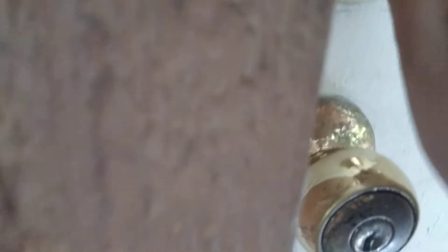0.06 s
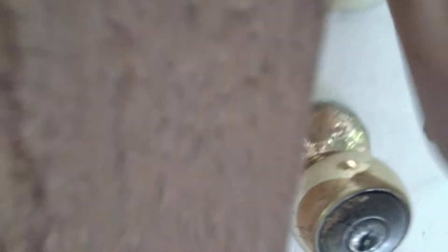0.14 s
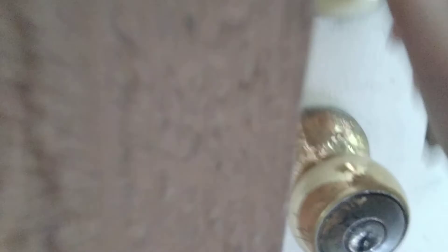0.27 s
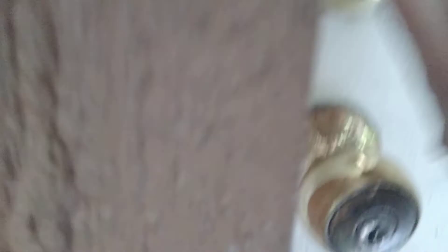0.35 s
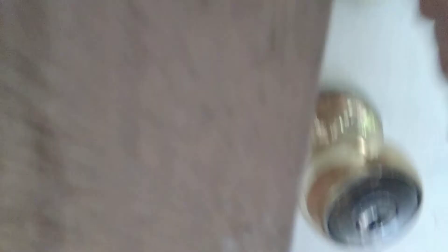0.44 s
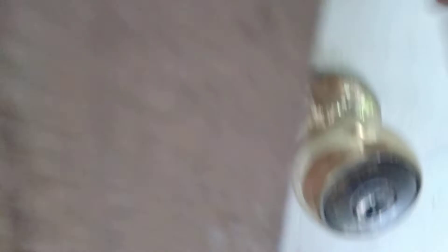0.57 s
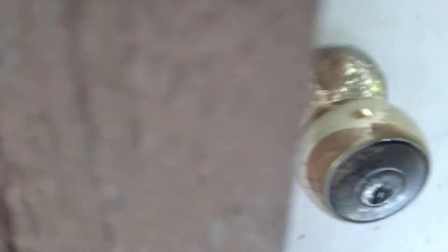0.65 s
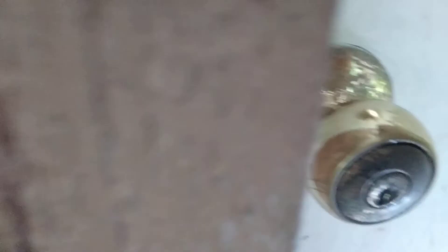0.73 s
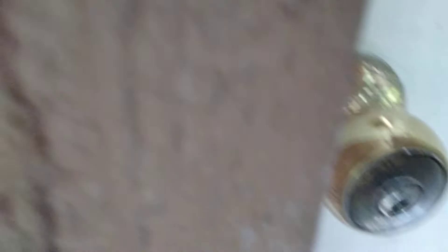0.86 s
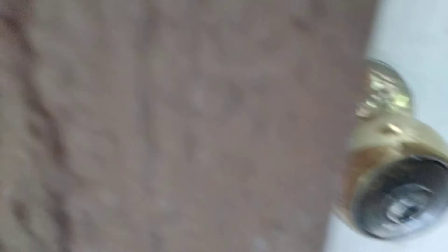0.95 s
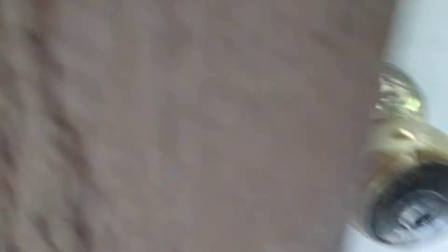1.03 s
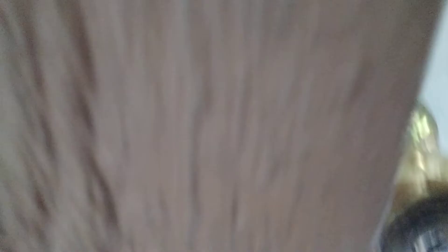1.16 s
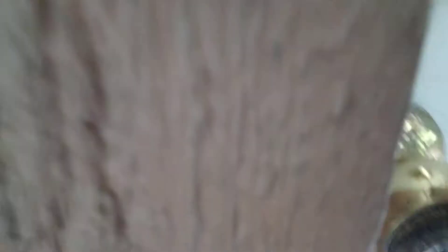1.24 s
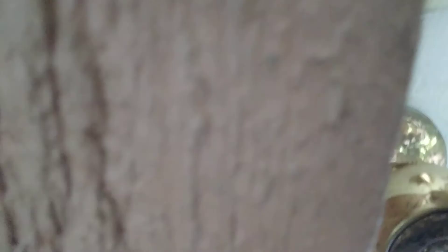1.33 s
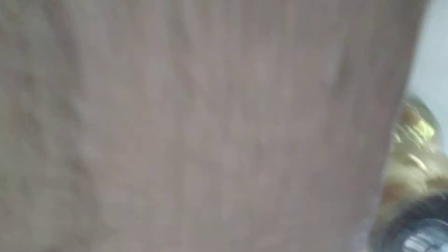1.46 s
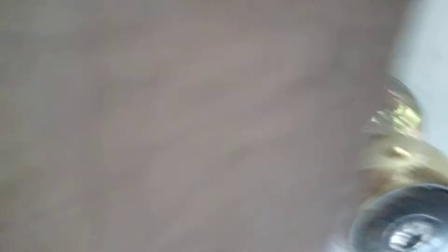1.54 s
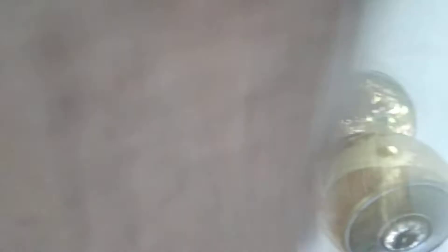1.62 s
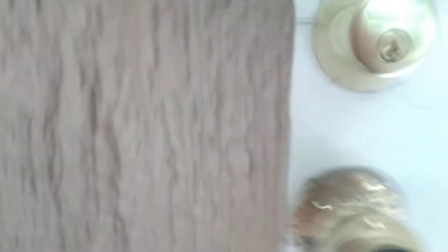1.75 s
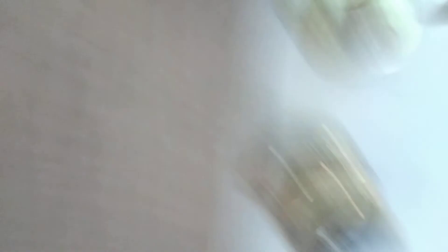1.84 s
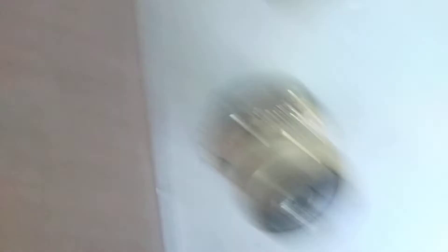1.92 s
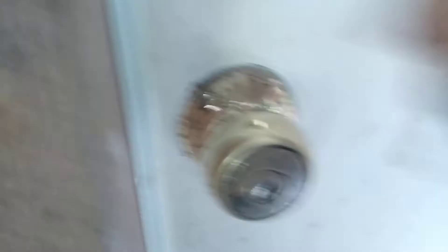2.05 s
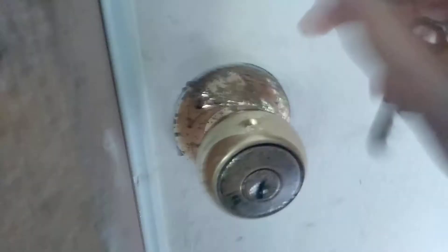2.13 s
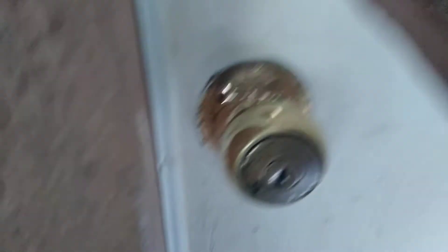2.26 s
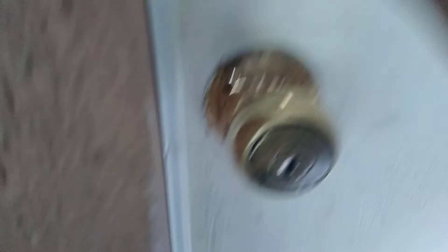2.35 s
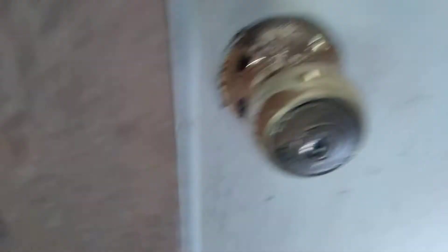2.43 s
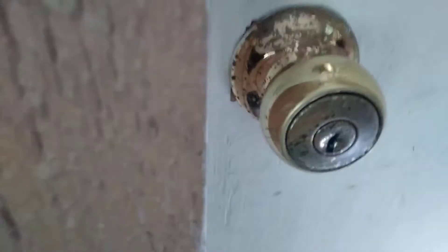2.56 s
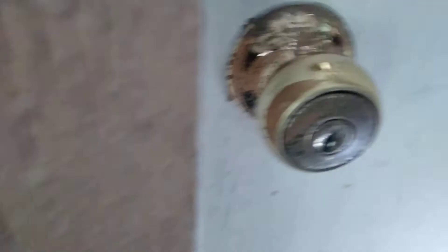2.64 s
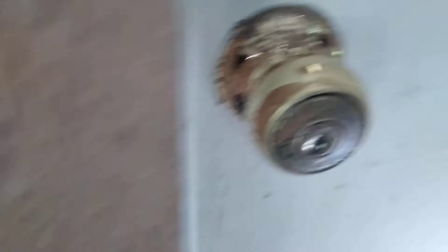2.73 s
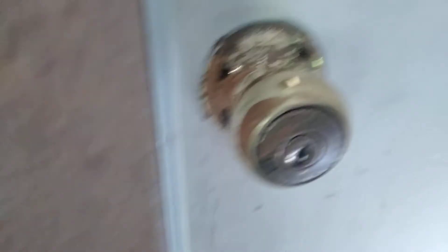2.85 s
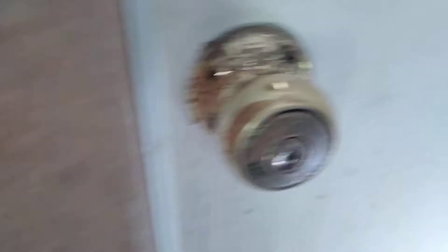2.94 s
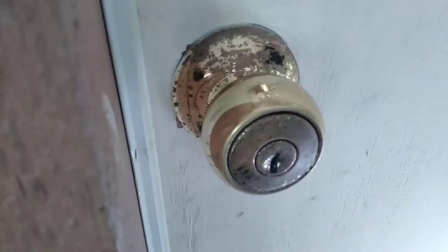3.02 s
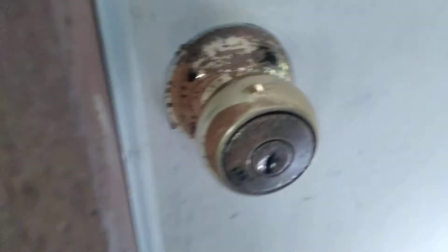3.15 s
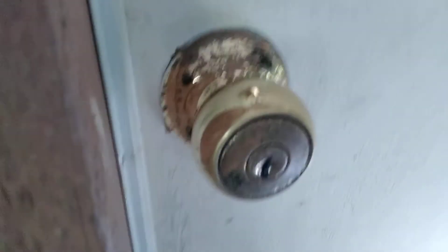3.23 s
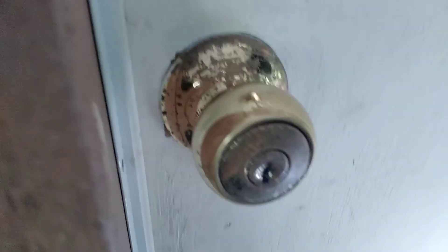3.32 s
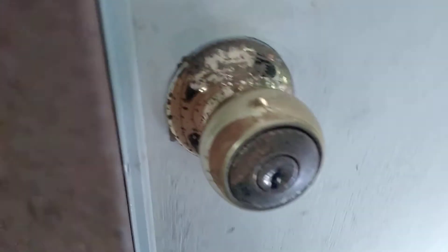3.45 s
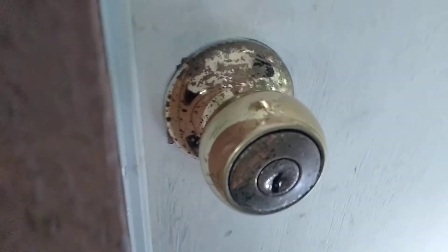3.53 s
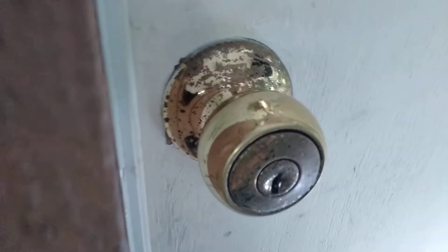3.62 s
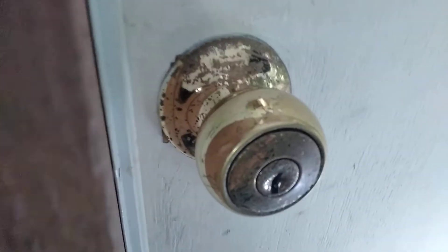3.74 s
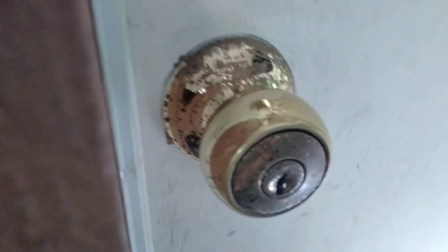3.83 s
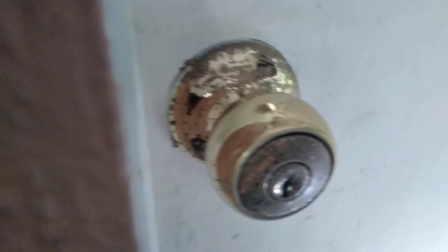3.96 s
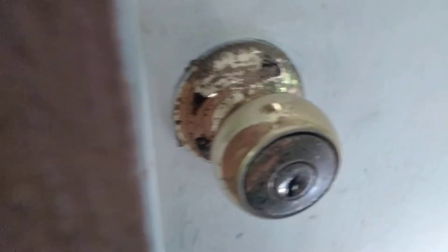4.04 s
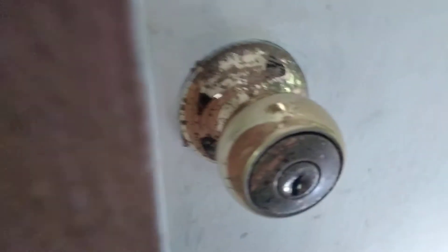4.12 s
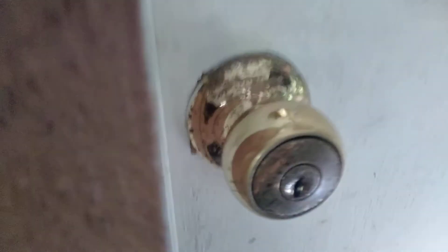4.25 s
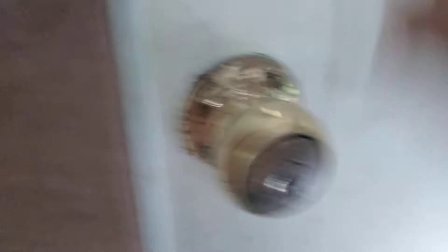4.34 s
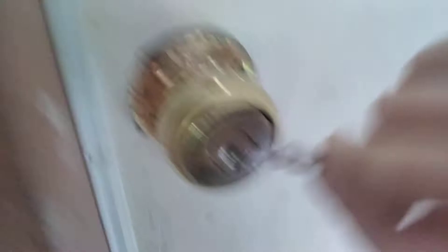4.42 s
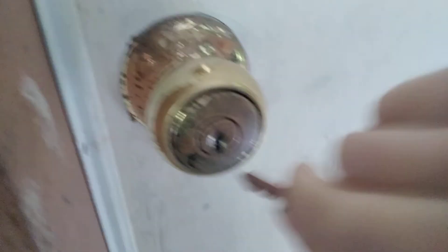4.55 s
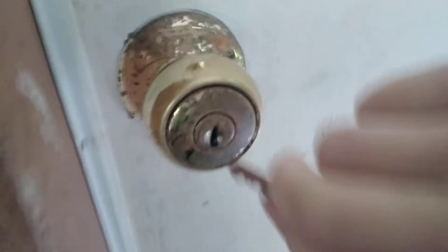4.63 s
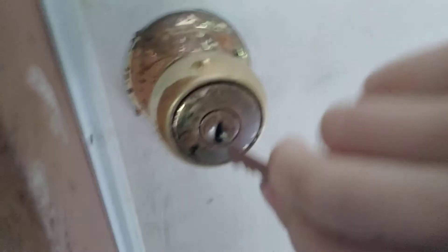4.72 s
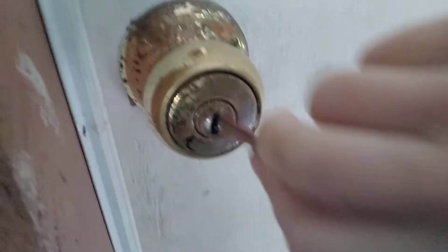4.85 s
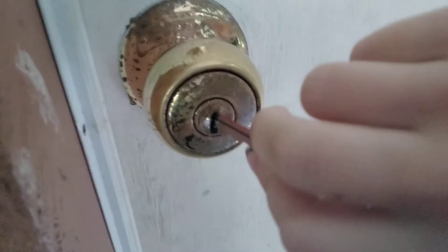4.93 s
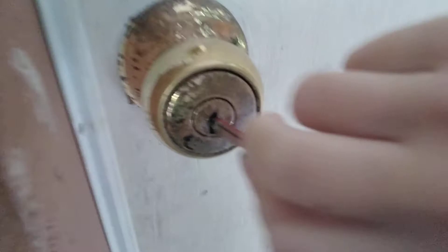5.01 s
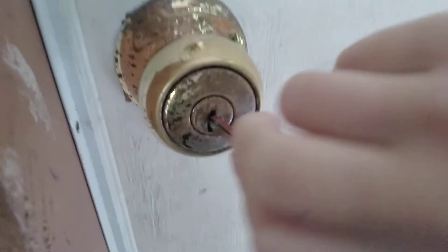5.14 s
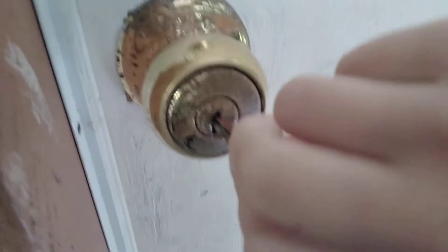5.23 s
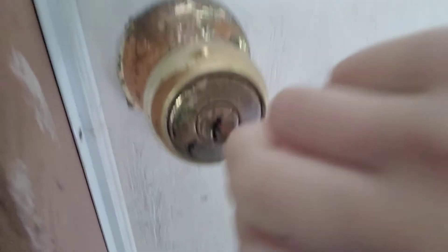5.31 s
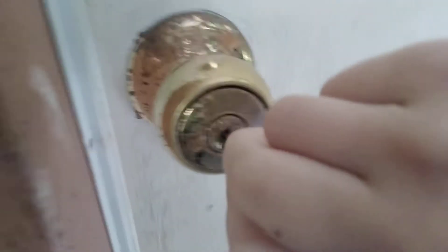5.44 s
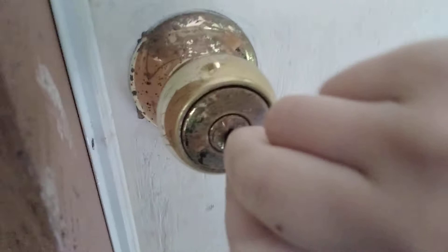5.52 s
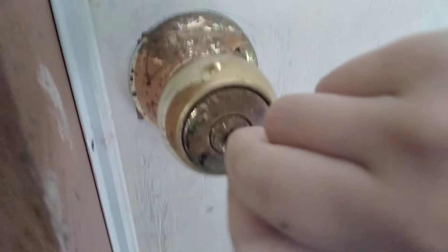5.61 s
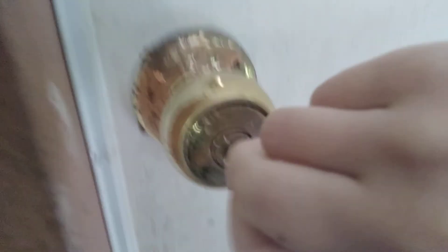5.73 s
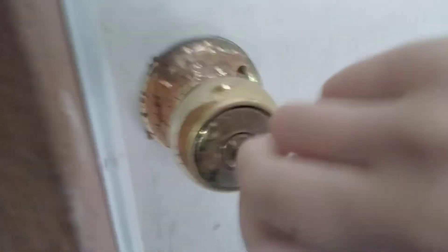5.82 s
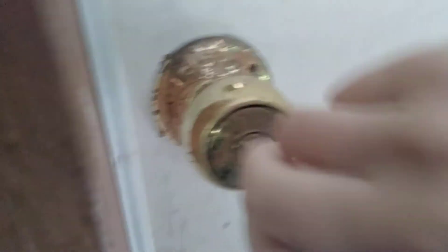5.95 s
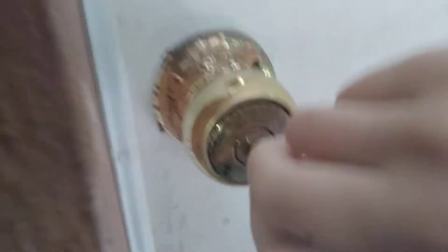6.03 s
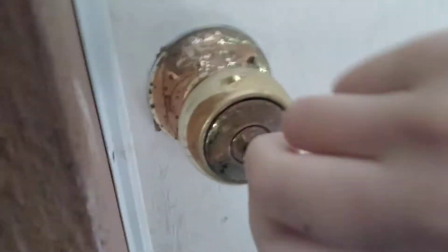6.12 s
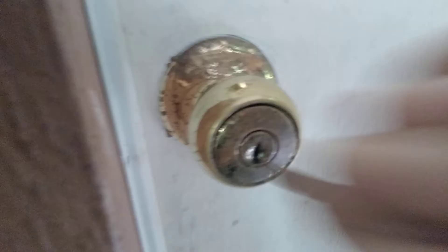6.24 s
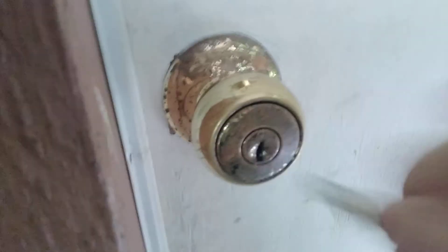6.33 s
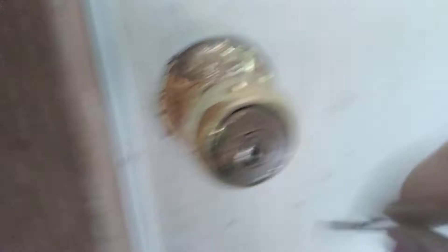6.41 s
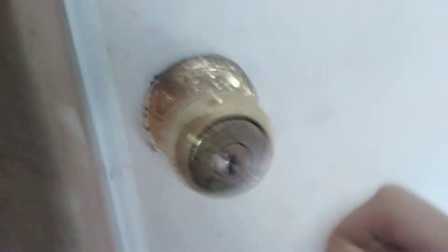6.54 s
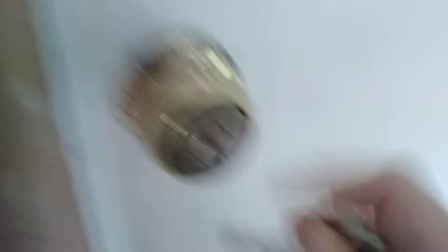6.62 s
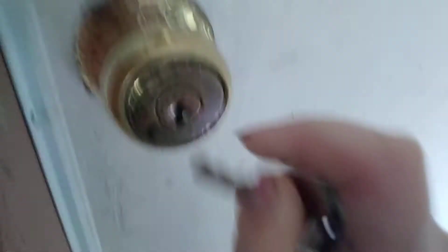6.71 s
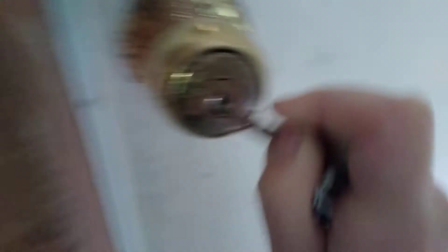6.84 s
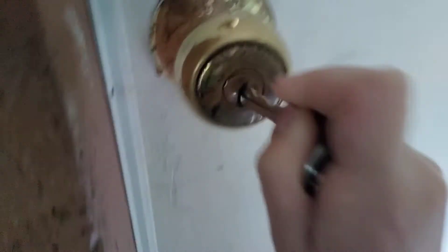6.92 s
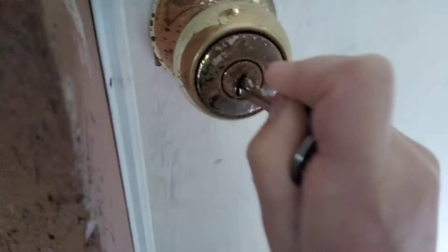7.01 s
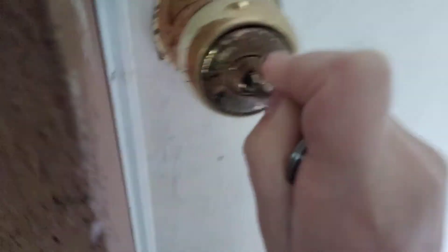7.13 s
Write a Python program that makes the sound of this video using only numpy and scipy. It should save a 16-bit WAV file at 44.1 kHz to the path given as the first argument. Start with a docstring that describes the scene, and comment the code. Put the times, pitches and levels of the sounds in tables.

```python
"""Beside a door: keys click in a hand, then one is pushed at the lock of a brass knob and jiggled.
Contacts are noise bursts (tick, clack) plus decaying key modes; knocks and bumps are damped sines.
Something rough scrapes in strokes very close by: random slips and noise in four effort-driven bands,
with short pressure dips as snaps, dry pin ticks and airy noise swells as brushes of skin and sleeve.
Behind are a low wavering hum with its octave, and filtered noise as distant traffic and room floor."""
import sys
import numpy as np
from scipy import signal
from scipy.fft import rfft, irfft
from scipy.io import wavfile

SR = 44100
rng = np.random.default_rng(int(sys.argv[2]) if len(sys.argv) > 2 else 0)


def bounce(signal):
    """Save signal as a 16-bit WAV file at the path given by the first command-line argument."""
    frames = np.transpose(np.atleast_2d(signal))
    limited = np.clip(frames, -1, 1)
    pcm = np.round(limited * 32767).astype(np.int16)
    wavfile.write(sys.argv[1], SR, pcm)


N = 316289
TIME = np.arange(N) / SR

# scraping strokes: (start/s, attack/s, hold/s, release/s, body level before trim/dB, bass level/dB,
# starting brightness 0-1)
STROKE_TABLE = [(4.971, .03, 0.07, 0.02, -53.5, -52, 0.1), (5.044, .046, .003, 0.17, -32.5, -38.5, 0.8),
                (5.194, 0.042, 0.031, 0.12, -40.5, -47, 0.47), (5.29, 0.06, .028, 0.023, -37, -41, 0),
                (5.531, 0.048, 0.058, 0.026, -34.5, -43.5, 0),
                (5.721, 0.068, 0.021, 0.14, -26, -37.5, 0.56),
                (5.906, 0.042, 0.061, 0.046, -37.5, -43.5, 0.61),
                (6.039, 0.029, 0.033, 0.063, -38.5, -49, 1), (6.124, 0.022, 0.047, 0.026, -57.5, -54, 0.4),
                (6.192, 0.052, 0.0099, 0.032, -33, -42, 1)]


def amp(db):
    """Decibels to gain."""
    return 10 ** (np.asarray(db) / 20)


def unit(x):
    """Scales to rms 1."""
    return x / np.sqrt(np.mean(x ** 2) + 1e-20)


def read(points, hz):
    """Interpolates a (f/Hz, value) table on a log-frequency axis."""
    f, value = np.transpose(points)
    return np.interp(np.log(hz + 1), np.log(f + 1), value)


def add(mix, start_s, sound):
    """Mixes a sound in at start_s."""
    part = mix[max(round(start_s * SR), 0):][:len(sound)]
    part += sound[:len(part)]


def shaped(x, gain):
    """Filters x by a gain that is a function of frequency; rms 1."""
    f = np.fft.rfftfreq(len(x), 1 / SR)
    return unit(irfft(rfft(x) * gain(f), len(x)))


def noise(spectrum):
    """Steady noise with the given spectrum; rms 1."""
    return shaped(rng.standard_normal(N), lambda f: amp(read(spectrum, f)))


def drift(rate_hz):
    """Random wander, low-passed near rate_hz; rms 1."""
    return shaped(rng.standard_normal(N), lambda f: 1 / (1 + (f / rate_hz) ** 4))


def resonance(f, hz, q):
    """Complex response of one resonance, about 1 at its centre."""
    return 1 / (1 + 1j * q * ((f + 1) / hz - hz / (f + 1)))


def burst(t, gain, t60_s, hold_s):
    """Many close modes as filtered noise: fast rise, short hold, exponential decay."""
    shape = amp(-60 * np.maximum(t - hold_s, 0) / t60_s) * (1 - np.exp(-t / 0.00074))
    hiss = shaped(rng.standard_normal(len(t)), gain)
    return unit(hiss * shape) * np.sqrt(np.mean(shape ** 2))


def keys(splash=0.27, splash_growth=0.86, tick_t60_s=0.012, tick_hold_s=0.00039, clack_hold_s=0.00019):
    """Each contact is a bright tick that rebounds, a clack of the bunch and a faint modal ring."""
    # metal contacts: (t/s, tick level/dB, tick f/Hz, clack level/dB, clack f/Hz, clack Q, looseness 0-1)
    contacts = [(0.435, -74, 6940, -55, 2800, 2.3, 0.3), (0.533, -45.5, 6500, -47.5, 3470, 0.78, 0.16),
                (0.547, -68, 5000, -48, 1890, 0.85, 0.33), (0.579, -41.5, 8000, -44, 3140, 3, 0.26),
                (0.7723, -62, 7140, -44.5, 850, 2.1, 0.23), (1.0138, -75, 6500, -53, 3400, 1.5, 0.33),
                (1.4186, -23, 7800, -36, 2860, 1.1, 0.41), (1.577, -52, 7000, -36, 2480, 0.43, 0.73),
                (1.5875, -22.5, 8900, -26, 2460, 2.2, 0.29), (1.593, -32, 5000, -32.5, 1090, 2.5, 0.57),
                (1.638, -15.5, 8900, -25.5, 900, .25, 0), (1.9835, -52, 7650, -51, 7600, 20, 0.15),
                (2.438, -34.5, 7000, -46.5, 700, 1.2, 0.77), (2.4449, -25, 9500, -41.5, 674, 1.3, 0.67),
                (2.478, -47, 8050, -52, 5000, 0.53, .5), (2.5255, -33.5, 5940, -38.5, 2820, 1.2, 0.46),
                (2.531, -45, 3900, -56, 5900, 9, 0.9), (2.535, -38.5, 6100, -42.5, 1120, 1.6, 0.47),
                (2.561, -45, 9600, -51.5, 1600, 0.45, 0.76), (2.699, -72, 4300, -42, 1830, 2.5, 0.48),
                (2.823, -59, 5700, -51, 2760, 0.61, 0.58), (2.837, -66, 5200, -42, 1250, 4.8, 0.2),
                (3.008, -78, 5000, -51.5, 1480, 5.1, 0.34), (3.112, -76, 5000, -56, 1370, 3.9, 0.5),
                (4.172, -46, 12500, -56, 4000, 0.91, .4), (4.1787, -61, 7500, -45.5, 1660, 2, 0.7),
                (4.1993, -29.5, 9300, -37, 1530, 2.8, .5), (4.1998, -29.5, 12800, -44.5, 3070, 9, 0.71),
                (4.3929, -38.5, 8240, -43.5, 3600, 4.6, 1), (4.412, -53, 7940, -56, 3780, 3, 1),
                (4.461, -47, 7860, -52, 3850, 0.67, 0.5), (4.4891, -54, 7900, -47.5, 1920, 1, 0.1),
                (4.875, -31, 8100, -47.5, 1480, 0.34, 0.92), (4.903, -51, 8000, -49, 3000, 0.63, 0.4),
                (4.993, -60, 4500, -44, 2390, 1.7, 0.35), (5.018, -39, 7500, -43.5, 3500, .7, .3),
                (5.5212, -35, 10000, -27.5, 910, .4, 0.22), (5.7346, -51, 5000, -20, 900, 0.65, 0),
                (6.9208, -52, 7700, -56, 2500, .5, 1), (6.939, -40.5, 7250, -44.5, 574, 0.83, 0.66)]
    # modes of the keys: (f/Hz, relative level/dB, t60/s)
    key_modes = [(1350, -3, 0.16), (1458, -3, .08), (1660, -6, .1), (2150, -6, 0.071), (3180, -8, 0.067),
                 (3380, -6, 0.15), (4370, -11, 0.17), (5000, -2, 0.11), (5469, -7, .12), (6360, -17, .18),
                 (7700, 5, 0.13), (9000, -7, 0.19), (9900, 6, 0.075), (12840, -12, .13)]
    # colour of the bunch: (f/Hz, level/dB)
    metal_colour = [(400, 12.5), (1000, 5.5), (1550, 7), (2100, 2), (3200, 2.5), (4300, 0.5), (5900, 3),
                    (7800, 0), (8700, -4.5), (9600, -3), (11500, -4.5), (12700, -9), (14000, -8),
                    (16000, -6.5)]
    # a looser bunch clacks longer and rings more, relative to its clack
    gripped_t60_s, loose_t60_s = 0.0096, 0.14
    gripped_ring_db, loose_ring_db = -32, -4
    rebound_s, rebound_db = .0068, -13
    overtone_ratio, overtone_db = 1.68, -6
    tick_q, ring_q = 28, .9

    ticks, bodies = np.zeros(N), np.zeros(N)
    t = np.arange(SR // 2) / SR
    for s, tick_db, tick_hz, clack_db, clack_hz, clack_q, loose in contacts:
        clack_t60_s = np.interp(loose, [0, 1], [gripped_t60_s, loose_t60_s])
        ring_db = clack_db + np.interp(loose, [0, 1], [gripped_ring_db, loose_ring_db])
        spread = splash * amp(splash_growth * (tick_db + 21))  # harder contacts spread wider in pitch

        def tick_gain(f):
            """Two narrow partials on a broad skirt, coloured by the metal."""
            first = abs(resonance(f, tick_hz, tick_q))
            overtone = amp(overtone_db) * abs(resonance(f, overtone_ratio * tick_hz, tick_q))
            skirt = spread * abs(resonance(f, tick_hz, 1.0)) ** 2
            return amp(read(metal_colour, f)) * (first + overtone + skirt)

        def clack_gain(f):
            """One resonance with a treble roll-off, coloured by the metal."""
            rolloff = 1 + (f / (11.0 * clack_hz + 3000)) ** 3
            return amp(read(metal_colour, f)) * resonance(f, clack_hz, clack_q) / rolloff

        tick = burst(t, tick_gain, tick_t60_s, tick_hold_s)
        clack = burst(t, clack_gain, clack_t60_s, clack_hold_s)
        # modes nearest the clack's pitch answer most; place of contact varies level and sign
        ring = np.zeros(len(t))
        for hz, db, t60_s in key_modes:
            vary_db, side = rng.standard_normal(2)
            decay = amp(db + vary_db - 60 * t / t60_s)
            answer = abs(resonance(hz, clack_hz, ring_q)) * np.sign(side)
            ring += answer * decay * np.sin(2 * np.pi * hz * t)
        add(ticks, s, amp(tick_db) * tick)
        add(ticks, s + rebound_s, amp(tick_db + rebound_db) * tick)
        add(bodies, s, amp(clack_db) * clack + amp(ring_db) * ring)
    return ticks, bodies


def pins(pitch_hz=3800, spread_db=20, hits_per_s=500):
    """Tiny dry damped-sine ticks of uneven strength as the key feels for the keyway."""
    # key teeth catching at the keyway: (from/s, to/s, ceiling/dB)
    spells = [(4.89, 5.045, -33.5), (5.39, 5.5, -32.5), (5.655, 5.72, -40)]
    ceiling = sum(amp(db) * (TIME > start) * (TIME < end) for start, end, db in spells)
    strength = ceiling * amp(-spread_db * rng.random(N) ** .5)
    hits = strength * (rng.random(N) < hits_per_s / SR)
    t = np.arange(256) / SR
    tick = np.exp(-t / 0.0001) * np.sin(2 * np.pi * pitch_hz * t + np.pi / 6)
    return signal.oaconvolve(hits, tick)[:N]


def knocks(thud_db=-9, thud_t60_s=0.14, thud_hold_s=0.00093):
    """Each blow swings one damped mode; higher ones also stir an upper mode and a panel thud."""
    # dull knocks of the door, bumps of the hand: (t/s, level/dB, f/Hz, t60/s)
    blows = [(1.581, -15.5, 137, 0.021), (1.589, -34.5, 473, 0.079), (1.605, -10.5, 30.3, 0.056),
             (1.635, -20, 22, 0.2), (1.6411, -15.5, 175, 0.023), (1.644, -37.5, 287, 0.13),
             (1.698, -17.5, 27.5, 0.15), (2.447, -49, 332, 0.17), (2.527, -45, 332, 0.046),
             (4.0106, -36.5, 295, 0.048), (4.395, -43, 574, 0.052), (4.752, -53, 855, 0.085),
             (4.829, -44.5, 245, 0.15), (4.876, -42, 435, 0.087), (5.523, -29.5, 349, 0.086),
             (5.735, -24.5, 217, 0.04), (6.258, -25, 167, 0.036), (6.946, -40, 352, 0.11),
             (6.963, -46.5, 488, .08), (7.155, -39.5, 366, 0.092)]
    # panel colour: (f/Hz, density/dB per Hz)
    panel_colour = [(60, 18), (250, 14), (420, 3), (700, -3), (1100, -6), (2500, -29.5), (8000, -50)]
    upper_ratio, upper_db = 1.5, -10  # the door panel's second mode
    out, t = np.zeros(N), np.arange(SR // 3) / SR
    for s, db, hz, t60_s in blows:
        panel_share = min(hz / 350, 1) ** 2  # low bumps hardly stir the panel
        upper = amp(upper_db) * np.sin(2 * np.pi * upper_ratio * hz * t)
        swing = np.sin(2 * np.pi * hz * t) + panel_share * upper
        mode = amp(-60 * t / t60_s) * swing * (1 - np.exp(-2 * t * hz))
        thud = burst(t, lambda f: amp(read(panel_colour, f)), thud_t60_s, thud_hold_s)
        add(out, s, amp(db) * (mode + amp(thud_db) * panel_share * thud))
    return out


def effort(start_s, attack_s, hold_s, release_s):
    """Effort of one stroke, 0-1: it builds, holds and lets go."""
    corners_s = start_s + np.cumsum([0, attack_s, hold_s, release_s])
    return np.interp(TIME, corners_s, [0, 1, 1, 0])


def scrape(grains_per_s=2500, flutter_db=1.16, body_db=-1.83, fizz_db=-10.5):
    """One-sided slips and rubbing noise; light effort gives mostly bass, full effort adds fizz."""
    # (f/Hz, density/dB per Hz)
    scrape_colour = [(35, -6), (60, -0.5), (91, -4.5), (172, -8.5), (262, -9), (330, -7), (503, -8),
                     (651, -6), (1040, -5.5), (1250, -3.5), (1470, -6), (6000, -9.5), (12400, -16),
                     (14900, -16), (16000, -16)]
    # (f/Hz, width/Hz, level/dB)
    scrape_modes = [(3100, 100, -24), (3720, 42, -24), (4840, 90, -11), (5200, 55, -6), (5900, 90, -4),
                    (6700, 380, -6.5), (7700, 1000, -13)]
    bass_power, body_power, fizz_power = 0.6, 1.42, 1.47  # band gain = effort ** power
    brighten_per_s = 2.5  # a stroke turns brighter as it goes on
    waver_db, waver_hz = 0.46, 28  # each band wavers on its own

    slip_size = amp(4 * np.minimum(rng.exponential(1, N), 3))
    slips = -slip_size * (rng.random(N) < grains_per_s / SR)
    drive = .55 * unit(slips - slips.mean()) + rng.standard_normal(N)
    drive *= amp(flutter_db * drift(90))

    def colour(f):
        """Broad spectrum with the modes on top."""
        modes = sum(amp(db) * resonance(f, hz, hz / width) for hz, width, db in scrape_modes)
        return amp(read(scrape_colour, f)) * abs(1 + modes)

    drive = shaped(drive, colour)
    low = lambda f: 1 / (1 + (f / 650) ** 4)
    high = lambda f: 1 - 1 / (1 + (f / 9700) ** 10)
    tilted = lambda f, slope: (1 - low(f) - high(f)) * (f / 4000 + .01) ** slope
    bass_band, fizz_band = shaped(drive, low), shaped(drive, high)
    dull_band = shaped(drive, lambda f: tilted(f, -.25))
    bright_band = shaped(drive, lambda f: tilted(f, .35))

    power = np.zeros((4, N))
    for start, attack, hold, release, level_db, bass_db, brightness in STROKE_TABLE:
        push = effort(start, attack, hold, release)
        on = push > 0
        bright = np.clip(brightness + brighten_per_s * (TIME[on] - start - attack), 0, 1)
        bass = amp(bass_db) * push[on] ** bass_power
        body = amp(level_db + body_db) * push[on] ** body_power
        fizz = amp(level_db + fizz_db) * push[on] ** fizz_power
        power[:, on] += np.square([bass, (1 - bright) * body, bright * body, fizz])
    bands = bass_band, dull_band, bright_band, fizz_band
    return sum(band * np.sqrt(p) * amp(waver_db * drift(waver_hz)) for band, p in zip(bands, power))


def snaps(width_s=.000045, grit_per_s=34, grit_db=-20, grit_spread_db=7):
    """Each snap is one short dip of pressure; lesser ones come by chance, more often under effort."""
    # loudest catches of grit: (t/s, peak/dB)
    loud_catches = [(5.0467, -14), (5.0853, -18), (5.0991, -18), (5.344, -17), (5.5988, -13),
                    (5.7526, -16.5), (5.8312, -17), (5.9336, -18)]
    push = sum(effort(*row[:4]) * amp(row[4]) for row in STROKE_TABLE)
    push = np.minimum(push / amp(-34), 1)
    grit = amp(grit_db - grit_spread_db * rng.random(N))
    catches = grit * (rng.random(N) < grit_per_s * push ** 2 / SR)
    for s, db in loud_catches:
        add(catches, s, amp([db]))
    t = np.arange(-SR // 200, SR // 200) / SR
    dip = -1 / (1 + (t / width_s) ** 2)
    return signal.oaconvolve(catches, dip, "same")


def brushes(trim_db=-11.5, flutter_db=2.4, flutter_hz=22):
    """Airy noise in Gaussian swells as skin and sleeve slide."""
    # soft brushes: (middle/s, level before trim/dB, Gaussian sigma/s)
    strokes = [(1.18, -55, 0.036), (1.788, -53.5, 0.13), (2.4, -54.5, 0.16), (2.98, -54, 0.19),
               (3.6, -63.5, 0.18), (4.487, -53, 0.051), (4.702, -39.5, 0.03), (6.54, -51, 0.12)]
    # (f/Hz, density/dB per Hz)
    brush_colour = [(1000, -6), (4000, -11.5), (6000, -8), (8000, -3.5), (11000, -10), (14300, -1.5),
                    (16000, -6)]
    swell = sum(amp(db) * np.exp(-.5 * ((TIME - s) / sigma) ** 2) for s, db, sigma in strokes)
    return noise(brush_colour) * swell * amp(trim_db + flutter_db * drift(flutter_hz))


def hum(base_hz=65.07, waver=0.0219, wander_db=2.5):
    """Sine of wavering pitch that swells about twice a second, and an octave that dies down early."""
    # mean level of the fundamental: (t/s, level/dB)
    hum_level = [(0, -51.5), (1.2, -49), (2.9, -56), (5.5, -52), (7.17, -52)]
    beat_hz, beat_db, crest_s = 1.98, 3.5, 3.61
    octave_loud_db, octave_quiet_db = -50, -68
    octave_drop_s, octave_fade_s = 0.97, 0.47
    phase = 2 * np.pi * np.cumsum(base_hz * (1 + waver * drift(7.36))) / SR
    beat = np.cos(2 * np.pi * beat_hz * (TIME - crest_s))
    level_db = np.interp(TIME, *np.transpose(hum_level)) + beat_db * beat + wander_db * drift(7.6)
    fade_s = [octave_drop_s, octave_drop_s + octave_fade_s]
    octave_db = np.interp(TIME, fade_s, [octave_loud_db, octave_quiet_db]) + 2.6 * drift(27)
    return amp(level_db) * np.sin(phase) + amp(octave_db) * np.sin(2 * phase)


def traffic(far_db=-68.5, pass_s=0.99, pass_half_s=1.44, pass_db=-60.5):
    """Steady wash of noise plus one distant vehicle going by, its level falling with distance."""
    # (f/Hz, density/dB per Hz)
    traffic_colour = [(100, 3.5), (300, 2.5), (600, -5.5), (850, 2), (1080, -2), (1300, -1), (1700, -12.5),
                      (4000, -19), (9000, -35.5)]
    passing = amp(pass_db) / np.hypot(1, (TIME - pass_s) / pass_half_s)
    return noise(traffic_colour) * np.hypot(amp(far_db), passing) * amp(1.3 * drift(13.0))


def floor(level_db=-52):
    """Room rumble and hiss: coloured noise, almost steady."""
    # (f/Hz, density/dB per Hz)
    floor_colour = [(20, 0.5), (35, 0), (80, -6), (130, -9.5), (180, -17), (350, -22.5), (520, -31),
                    (850, -32), (1300, -40), (1800, -39.5), (3500, -45), (6500, -41), (11000, -44),
                    (16000, -44)]
    return noise(floor_colour) * amp(level_db + 0.17 * drift(20.0))


def room(x):
    """Diffuse tail: noise of unit energy, each band dying at its own speed."""
    # (f/Hz, t60/s)
    decay_times = [(100, 0.61), (1000, 0.52), (3000, 0.51), (7000, 0.73), (15000, 0.35)]
    hz, t, z = signal.stft(rng.standard_normal(SR), SR, nperseg=256)
    decay = amp(-60 * t / read(decay_times, hz)[:, None])
    tail = signal.istft(z * decay, SR, nperseg=256)[1]
    return signal.fftconvolve(x, tail / np.linalg.norm(tail))[:N]


def scene(ticks_room_db=-21, keys_room_db=-13, scrape_room_db=-32):
    """The keys sound into the room; the scraping is too close to stir it much."""
    ticks, bodies = keys()
    rubbing = scrape() + snaps() + pins()
    sends = amp(ticks_room_db) * ticks + amp(keys_room_db) * bodies + amp(scrape_room_db) * rubbing
    close = ticks + bodies + rubbing + knocks() + brushes()
    return (close + room(sends) + hum() + traffic() + floor())[None]


def record(dry, edge_hz=15900):
    """Band limit: linear-phase low-pass."""
    lowpass = signal.firwin(511, edge_hz, window=("kaiser", 9), fs=SR)
    return signal.oaconvolve(dry, lowpass[None], "same")


dry = scene()
out = record(dry)
bounce(out)
```